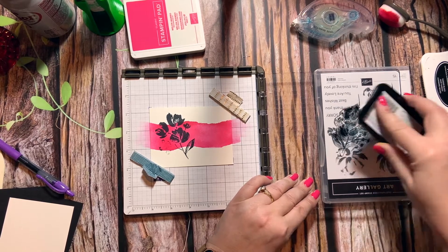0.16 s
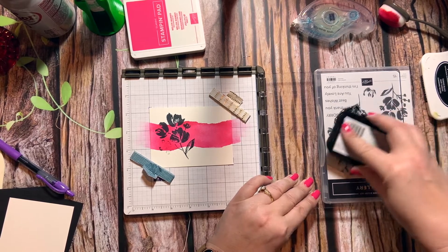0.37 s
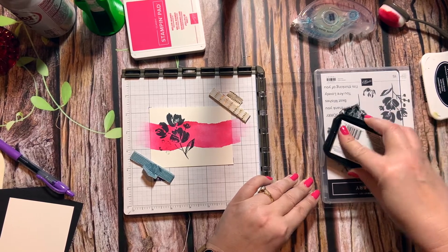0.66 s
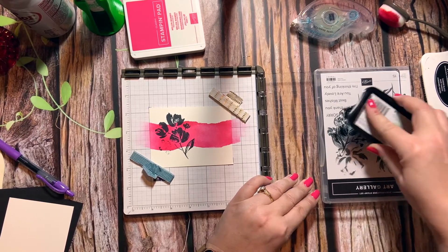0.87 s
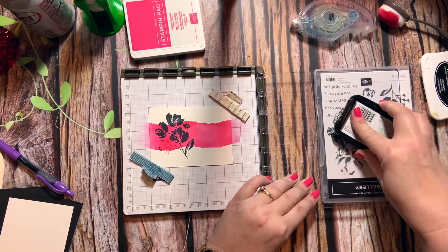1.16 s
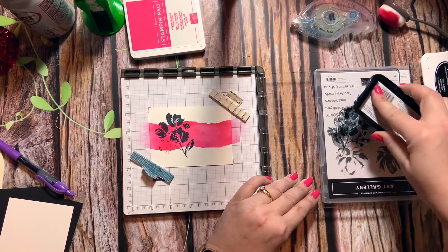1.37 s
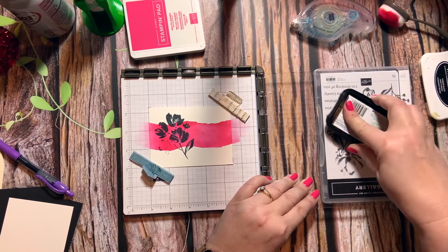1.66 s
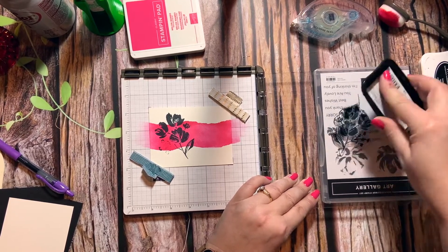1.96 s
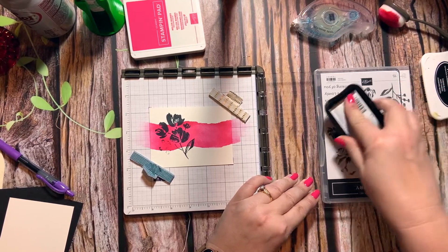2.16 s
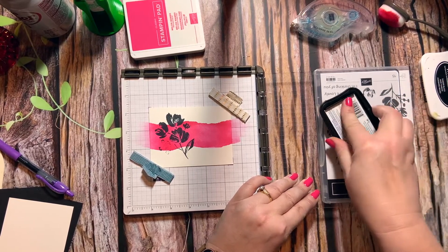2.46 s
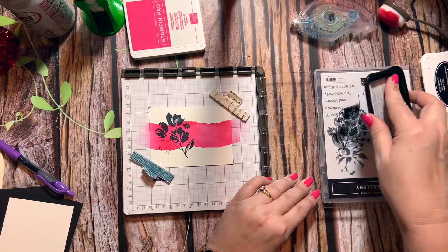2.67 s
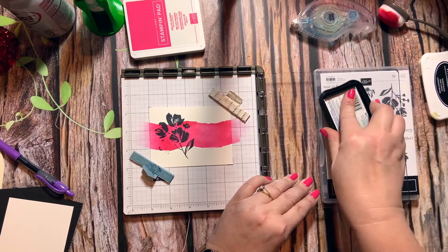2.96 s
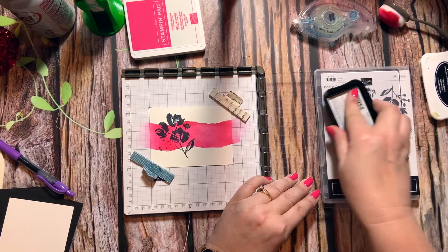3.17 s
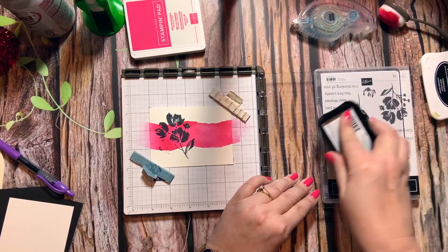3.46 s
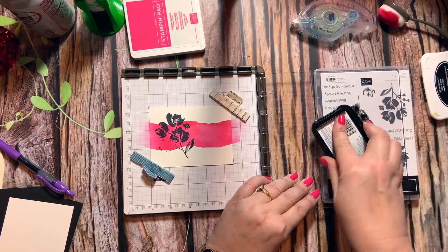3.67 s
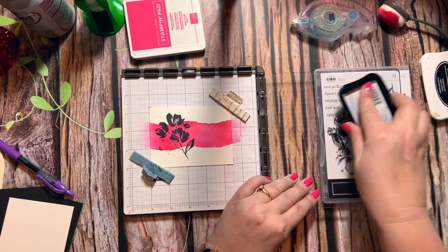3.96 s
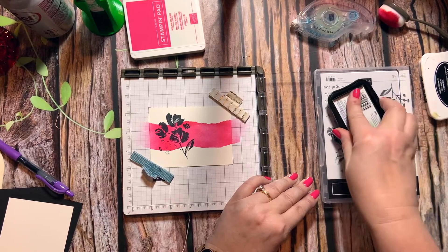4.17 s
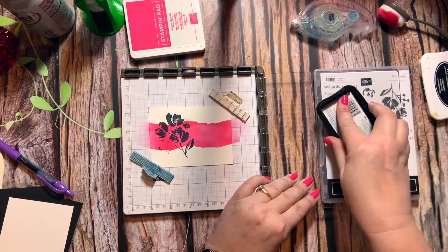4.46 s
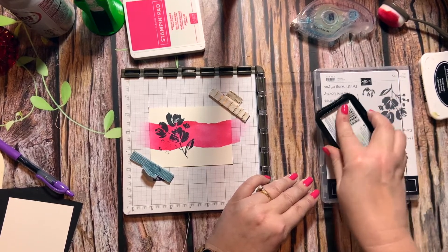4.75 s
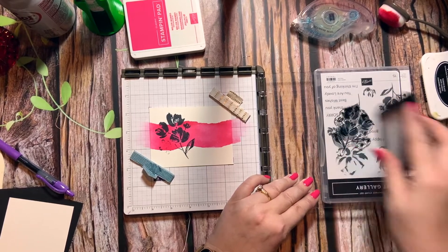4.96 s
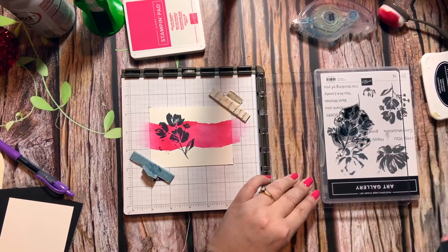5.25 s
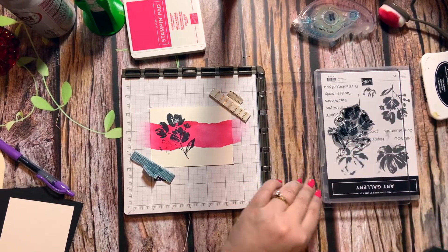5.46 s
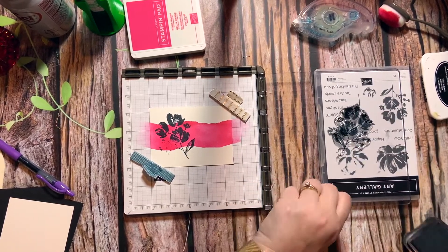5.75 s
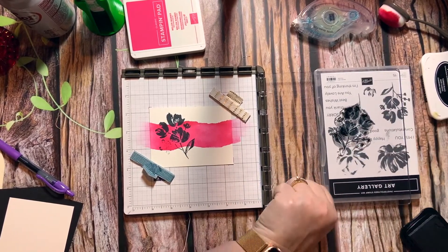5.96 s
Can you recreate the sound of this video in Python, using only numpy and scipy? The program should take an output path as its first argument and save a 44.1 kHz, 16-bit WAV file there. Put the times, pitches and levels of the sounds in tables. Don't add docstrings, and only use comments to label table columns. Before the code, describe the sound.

Spaced hollow plastic taps with soft table thuds and sticky peeling crackles, ending in brief scuffs and a sharp, bright lid snap.

```python
import sys
import numpy as np
from scipy import signal
from scipy.fft import rfft, irfft, next_fast_len
from scipy.io import wavfile
from scipy.ndimage import uniform_filter1d

SR = 44100
rng = np.random.default_rng(int(sys.argv[2]) if len(sys.argv) > 2 else 0)


def transcribe(u):
    v = np.clip(np.atleast_2d(u).T, -1, 1)
    q = np.round(v * 32767).astype(np.int16)
    wavfile.write(sys.argv[1], SR, q)


def level_to_linear(level):
    exponent = np.asarray(level, float) / 20
    return 10 ** exponent


N = 269451


def shaped(x, low_hz, high_hz):
    return signal.sosfilt(signal.butter(2, [low_hz, min(high_hz, 0.45 * SR)], "band", fs=SR, output="sos"), x)


def softened(x, top_hz):
    return signal.sosfilt(signal.butter(2, top_hz, fs=SR, output="sos"), x)


def rms_one(x):
    return x / np.sqrt(np.mean(x ** 2) + 1e-20)


def ring(clicks, pitch_hz, t60_s):
    shrink = level_to_linear(-60 / (t60_s * SR))
    turn = 2 * np.pi * pitch_hz / SR
    return signal.lfilter([0, np.sin(turn)], [1, -2 * shrink * np.cos(turn), shrink ** 2], clicks + 1e-18)


def ring_all(push, modes):
    return sum(level_to_linear(level_db) * ring(push, pitch_hz, t60_s) for pitch_hz, level_db, t60_s in modes)


def struck(times, db, modes, scatter_db, near_hz=None, slope_db=0, lean=0):
    at = (np.array(times) * SR).astype(int)
    luck = rng.standard_normal((len(at), len(modes), 2))
    out = np.zeros(N)
    for k, (pitch_hz, mode_db, t60_s) in enumerate(modes):
        off_db = 0 if near_hz is None else slope_db * np.abs(np.log2(pitch_hz / near_hz))
        strength = level_to_linear(db + mode_db - off_db + scatter_db * luck[:, k, 0])
        clicks = np.zeros(N)
        clicks[at] = strength * np.sign(luck[:, k, 1] + lean)
        out += ring(clicks, pitch_hz, t60_s)
    return out


def bursts(times, db, rise_s, fall_s):
    t = np.arange(N) / SR
    out = np.zeros(N)
    for s, level_db, rise, fall in np.broadcast(times, db, rise_s, fall_s):
        near = slice(max(0, int((s - 8 * rise) * SR)), int((s + 8 * fall) * SR))
        out[near] += level_to_linear(level_db) * np.exp(np.minimum((t[near] - s) / rise, (s - t[near]) / fall))
    return out


def grit(per_s, spread_db):
    sizes = level_to_linear(spread_db * np.minimum(rng.exponential(1, N), 4)) * rng.choice([-1, 1], N)
    return rms_one(sizes * (rng.random(N) < per_s / SR))


def hollow(times, db, pitches, cycles):
    out = np.zeros(N)
    t = np.arange(int(0.08 * SR)) / SR
    for s, level_db, hz in zip(times, db, pitches):
        swell = 1 - np.exp(-3.0 * t * hz)
        note = level_to_linear(level_db - 60 * t * hz / cycles) * np.sin(2 * np.pi * hz * t) * swell
        out[int(s * SR):int(s * SR) + len(t)] += note
    return out


# start_s [s], peak_db [dB], hollow_hz [Hz], crack_db [dB]
SLAPS = [(0.4084, -22.5, 645, -40.5), (0.4115, -20, 550, -39), (0.9847, -17.5, 630, -30.5),
         (1.5613, -17, 730, -29.5), (2.272, -36, 570, -48.5), (2.868, -37, 595, -57),
         (2.8731, -29.5, 250, -33.5), (2.877, -26.5, 520, -35.5), (3.513, -28.5, 795, -41),
         (3.548, -39.5, 790, -51), (4.028, -21, 320, -33.5), (4.033, -17.5, 247, -38),
         (4.0355, -16.5, 500, -15), (4.399, -26, 278, -41), (4.402, -20.5, 323, -30.5),
         (4.408, -19, 535, -18.5), (4.6766, -21, 550, -28), (4.681, -12.5, 427, -30),
         (5.825, -40.5, 998, -44)]
# start_s [s], peak_db [dB], hollow_hz [Hz]
PRESSES = [(0.392, -40.5, 725), (0.4019, -13.5, 690), (0.969, -33, 300), (0.9745, -20.5, 272),
           (0.981, -21.5, 232), (1.549, -22.5, 296), (1.5537, -23, 271), (2.198, -45.5, 232),
           (2.209, -51, 224), (2.881, -24, 484), (3.504, -36, 346), (3.517, -33, 229), (4.041, -20.5, 214),
           (4.669, -37.5, 231), (5.531, -43, 483), (5.541, -18, 635), (5.544, -22, 278), (5.551, -26, 232),
           (5.558, -16, 300), (5.837, -48, 275)]
# pitch_hz [Hz], level_db [dB], t60_s [s]
CASE = [(449, -11, 0.018), (514, -8, .035), (630, -9.5, 0.048), (722, -6.5, .03), (870, -13.5, 0.027),
        (1002, -2, 0.033), (1010, -20.5, 0.023), (1180, -9.5, 0.021)]
# pitch_hz [Hz], level_db [dB], t60_s [s]
SHELL = [(1690, -16, .008), (2320, 0.5, 0.015), (2563, 5, 0.0083), (3230, -8, 0.002), (4200, 0, 0.0055),
         (6150, -4, .005)]


def taps():
    presses = [(s, db, hz, -45.5 + 0.43 * (db + 26.0)) for s, db, hz in PRESSES]
    s, peak_db, hz, crack_db = np.transpose(SLAPS + presses)
    air = hollow(s, peak_db + 4.5, hz, cycles=6.54)
    case = struck(s + 0.00095, peak_db - 4.0, CASE, scatter_db=2.5, near_hz=hz, slope_db=5.0)
    case = softened(case, 1500)
    sharp = bursts(s + 0.0012, crack_db - 8.5, rise_s=0.00063, fall_s=0.0017)
    hiss = bursts(s, crack_db - 31.0, rise_s=0.0066, fall_s=0.012)
    knock = (sharp + hiss) * grit(9000, 2.64)
    hardness = bursts(s[:len(SLAPS)], 9.8, rise_s=0.0055, fall_s=0.02)
    hard = np.clip(hardness, level_to_linear(-15.0), 1) * knock
    shell = level_to_linear(-16.0) * ring_all(hard, SHELL)
    low_crack = level_to_linear(8.0) * shaped(knock, 620, 2700)
    high_crack = shaped(hard, 2600, 6100) + level_to_linear(-3.0) * shaped(hard, 10500, 13000)
    return air + case + shell + low_crack + high_crack


# loudest_s [s], crackle_db [dB], spread_s [s], case_pop_db [dB]
PEELS = [(0.048, -40.5, 0.0048, -40.5), (0.055, -45.5, 0.005, -46), (0.668, -38, 0.0098, -37),
         (1.239, -36, 0.0072, -37), (1.776, -55.5, 0.0013, -59), (1.798, -50.5, 0.0066, -42),
         (1.81, -38, 0.0072, -45.5), (2.491, -31.5, 0.0048, -37.5), (3.149, -35.5, 0.0054, -38.5),
         (3.163, -46, 0.0049, -53), (3.326, -57, 0.0017, -61), (3.691, -46, 0.0059, -49.5),
         (4.571, -39.5, 0.0024, -47), (4.848, -44.5, 0.0015, -41.5), (4.916, -55, 0.0013, -61),
         (4.981, -53, 0.00089, -66), (5.58, -52, 0.0011, -54), (5.54, -45, 0.0014, -52),
         (5.692, -48, 0.001, -41), (5.789, -62, 0.006, -47.5), (5.85, -50, 0.002, -68.5),
         (5.902, -53, 0.008, -44)]


def peels():
    s, crackle_db, spread_s, pop_db = np.transpose(PEELS)
    tear_db = crackle_db - 5.5 - 2.9 * np.log2(spread_s / 0.0061)
    tearing = bursts(s, tear_db, spread_s, 1.1325 * spread_s) * grit(7000, 3.8)
    crackle = shaped(tearing, 2160, 4594.2)
    crackle = crackle + level_to_linear(-1.5) * shaped(tearing, 6000, 8400) + level_to_linear(-5.0) * shaped(tearing, 10500, 21000)
    spring = bursts(s, pop_db - 19.5, rise_s=0.0047, fall_s=0.0045) * grit(3900, 4.45)
    return crackle + ring_all(spring, CASE[::2])


# pitch_hz [Hz], level_db [dB], t60_s [s]
TABLE_TOP = [(47.2, -5.5, 0.19), (59.3, -2, 0.31), (82.9, -3, 0.22), (118, 3.5, 0.19), (189, -12.5, 0.18),
             (209.5, 0.5, .1), (276, -1.5, 0.22)]


def table_top(times, db, hz):
    late = np.array(times) + 0.00409
    thud = struck(late, db, TABLE_TOP, scatter_db=2.5, near_hz=hz, slope_db=11.0, lean=20)
    return softened(thud, 320)


# start_s [s], level_db [dB], pitch_hz where the top gives most [Hz]
THUDS = [(0.056, -40, 115), (0.4012, -26.5, 117), (0.412, -22, 116), (0.677, -53, 144), (0.972, -24, 75),
         (0.984, -23.5, 100), (1.247, -34.5, 64.5), (1.548, -28, 112), (1.559, -24.5, 78),
         (1.783, -44.5, 81), (1.813, -38.5, 85), (2.2057, -32.5, 116), (2.502, -41, 110), (2.88, -26, 115),
         (3.160, -43.5, 118), (3.510, -26.5, 114), (3.5174, -32, 114), (3.5284, -36, 112), (3.55, -36, 82),
         (3.697, -46, 57), (4.029, -29.5, 116), (4.039, -19, 77), (4.402, -20.5, 116), (4.579, -39, 118),
         (4.669, -17.5, 54), (4.680, -19.5, 54), (4.857, -37, 50), (5.545, -35, 105), (5.555, -28, 105),
         (5.838, -43, 114)]


def thuds():
    s, db, hz = np.transpose(THUDS)
    return table_top(s, db - 5.5, hz)


# start_s [s], peak_db [dB]
SNAPS = [
    (5.9439, -28),
    (5.947, -23),
    (5.951, -19),
    (5.954, -21),
    (5.9571, -6),
    (5.959, -5.5),
    (5.9664, -16),
    (5.977, -17),
]
# pitch_hz [Hz], level_db [dB], t60_s [s]
LID = [(1000, -16, .015), (1260, -10, 0.021), (2120, -7, 0.01), (2244, 2.5, 0.0207), (2757.9, -7, 0.016),
       (3130, -11.5, 0.0062), (3720, -11, 0.014), (4515.4, -8, .008), (5470, -1, 0.0056),
       (6800, -28, 0.0034)]


def lid():
    s, peak_db = np.transpose(SNAPS)
    rattle = bursts(s, peak_db - 11.5, rise_s=0.00028, fall_s=0.00317) * grit(6000, 2.8)
    rings = struck(s, peak_db - 9.5, LID, scatter_db=3.5)
    rings = rings + level_to_linear(-20.5) * ring_all(rattle, LID)
    crack = shaped(rattle, 1100, 9300) + level_to_linear(-16.0) * shaped(rattle, 7100, 14000)
    thud = table_top(s[4:6], peak_db[4:6] - 27.0, 118.0)
    return rings + crack + shaped(thud, 61, 2000)


# start_s [s], held_s [s], bright_db [dB], dull_db [dB]
SCUFFS = [
    (4.21, 0.03, -68, -91),
    (5.16, 0.41, -79.5, -75.5),
    (5.537, .03, -70.5, -45.5),
    (5.575, 0.023, -51.5, -54),
    (5.625, .03, -60.5, -61),
    (5.674, 0.027, -55, -63.5),
    (5.72, 0.043, -56, -66.5),
    (5.789, 0.034, -66, -61.5),
    (5.85, 0.088, -65, -63.5),
]


def slide():
    rise_s, fall_s, patchy_db, patches_per_s = 0.00683, 0.012, 3, 49
    t = np.arange(N) / SR
    bright, dull = 0, 0
    for s, held_s, bright_db, dull_db in SCUFFS:
        shape = np.exp(np.minimum(0, np.minimum((t - s) / rise_s, (s + held_s - t) / fall_s)))
        bright = bright + level_to_linear(bright_db) * shape
        dull = dull + level_to_linear(dull_db) * shape
    patches = uniform_filter1d(rng.standard_normal((3, N)), int(SR / patches_per_s))
    patches = uniform_filter1d(patches, int(SR / patches_per_s / 2))
    patchy = level_to_linear(patchy_db * rms_one(patches))
    rub = grit(7300, 3.2)
    plastic = patchy[0] * rms_one(shaped(rub, 4100, 10300))
    fizz = level_to_linear(-2.5) * patchy[2] * rms_one(shaped(rub, 12000, 14000))
    cloth = patchy[1] * rms_one(shaped(rub, 380, 2020))
    return bright * (plastic + fizz) + dull * cloth


# start_s [s], peak_db [dB], pitch_hz [Hz]
SQUEAKS = [
    (3.565, -61, 4160),
    (3.666, -57, 4000),
    (3.693, -56, 3920),
    (4.213, -56, 5300),
]


def squeaks():
    slips = grit(5000, 2.2)
    out = 0
    for s, db, hz in SQUEAKS:
        squeak = bursts(s, db + 11.0, rise_s=0.0017, fall_s=0.003) * slips
        out = out + shaped(squeak, hz / 1.08, hz * 1.08)
    return out


# pitch_hz [Hz], span [ratio each way], level_db [dB], t60_s [s], alike left and right [0-1]
ROOM = [(134, 1.54, -7, 0.43, 0.87), (300, 1.503, -4.5, 0.27, 0.63), (737, 1.31, -7.5, 0.24, 0.3),
        (1620, 1.47, -8.5, 0.31, 0.13), (2840, 1.33, -8.5, 0.28, .1), (4930, 1.2, -5.5, 0.17, 0.4),
        (7287, 1.25, -12.5, 0.17, 1), (12530, 1.25, -14.5, .12, 0.7)]


def room(x):
    white = rng.standard_normal((2, 3, N))
    build = np.exp(-1 / (0.0013 * SR))
    tail = 0
    for k, (hz, span, db, t60_s, alike) in enumerate(ROOM):
        low_hz, high_hz = hz / span, hz * span
        keep = level_to_linear(-120 / (t60_s * SR))
        given = signal.lfilter([1 - build], [1, -build], shaped(x, low_hz, high_hz) ** 2)
        stored = signal.lfilter([1 - keep], [1, -keep], given)
        own, shared = white[k % 2, :2], white[k % 2, 2]
        mixed = np.sqrt(alike) * shared + np.sqrt(1 - alike) * own
        noise = rms_one(shaped(mixed, low_hz, high_hz))
        tail = tail + level_to_linear(db) * np.sqrt(np.maximum(stored, 0)) * noise
    return tail


# pitch_hz [Hz], level_db [dB per Hz], share common to left and right [0-1]
HUSH = [(19.303, -24, 0.7), (40.1, -6, 1), (70, 0, 0.9), (119.4, -4, .8), (250, -11.5, 0.81),
        (500, -20.5, 0.3), (990, -24.5, .3), (2356, -29, .3), (3940.7, -32, 0.1), (7840, -35, 0.7),
        (13000, -35.5, 1), (14600, -33.5, .9), (16300, -64, 0.8)]


def hush():
    hz, db, share = np.transpose(HUSH)
    size = next_fast_len(N)
    log_hz = np.log(np.fft.rfftfreq(size, 1 / SR) + 1)
    share = np.clip(np.interp(log_hz, np.log(hz), share), 0, 1)
    noise = rfft(rng.standard_normal((3, size))) * level_to_linear(np.interp(log_hz, np.log(hz), db))
    both = irfft(noise[2] * np.sqrt(share) + noise[:2] * np.sqrt(1 - share), size)[:, :N]
    return level_to_linear(-62) * rms_one(both)


def placed(x, pan_db):
    return x * level_to_linear([[pan_db / 2], [-pan_db / 2]])


def scene():
    pad = taps() + peels() + thuds() + squeaks()
    rub = slide()
    catch = lid()
    near = placed(pad, pan_db=1.9) + placed(rub, pan_db=2.0) + placed(catch, pan_db=2.5)
    return near + room(pad + rub + catch) + hush()


# pitch_hz [Hz], lead of the left over the right [radians]
PORT_PHASE = [(400, 0), (1500, 1.31), (4000, 1.16), (6500, 1.38), (8100, 1.5), (9200, 3.5), (10400, 3),
              (11500, 7.5), (14000, 7)]


def two_ports(x):
    size = next_fast_len(N)
    hz, lead = np.transpose(PORT_PHASE)
    lead = np.interp(np.log(np.fft.rfftfreq(size, 1 / SR) + 1), np.log(hz), lead)
    return irfft(rfft(x, size) * np.exp(0.5j * lead * [[1], [-1]]), size)[:, :N]


def roll_off(x):
    return signal.sosfilt(signal.butter(12, 16520, fs=SR, output="sos"), x)


def record(dry):
    x = two_ports(dry)
    x = signal.sosfilt(signal.butter(3, 36, "high", fs=SR, output="sos"), x)
    x = signal.sosfilt(signal.butter(6, 15600, fs=SR, output="sos"), x)
    return roll_off(x)


dry = scene()
out = record(dry)
transcribe(out)
```